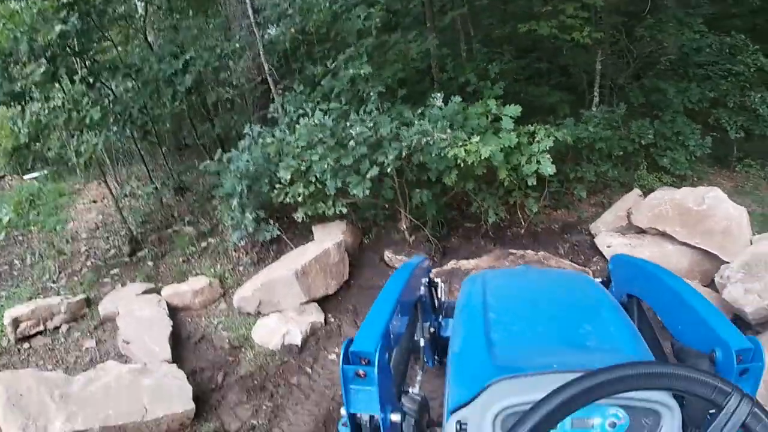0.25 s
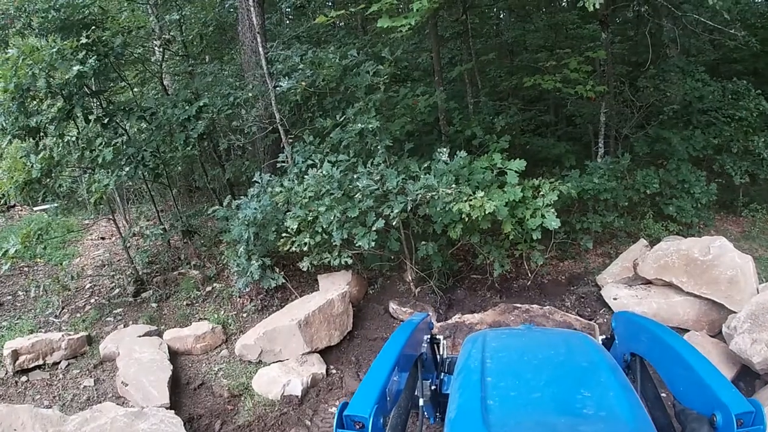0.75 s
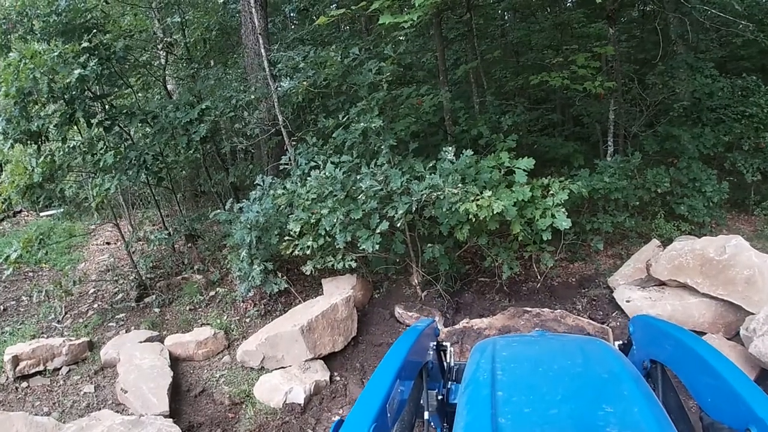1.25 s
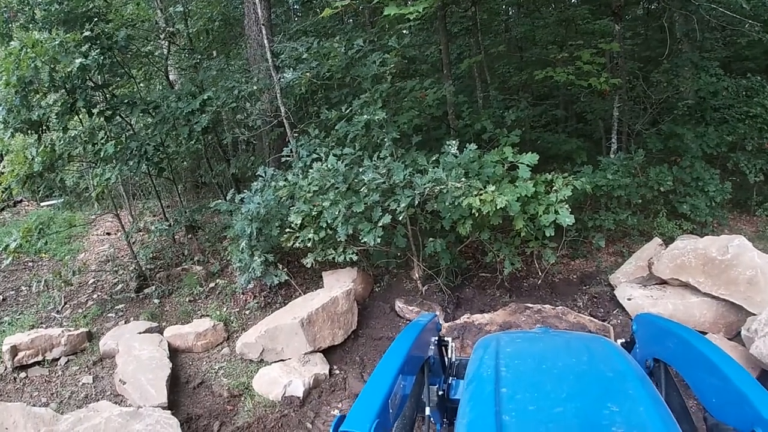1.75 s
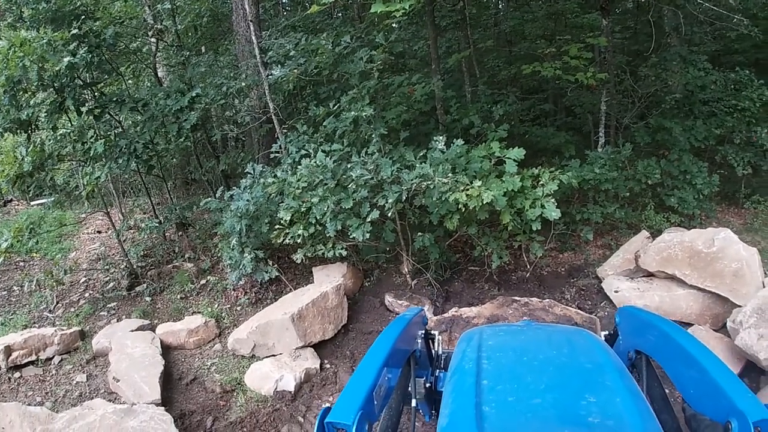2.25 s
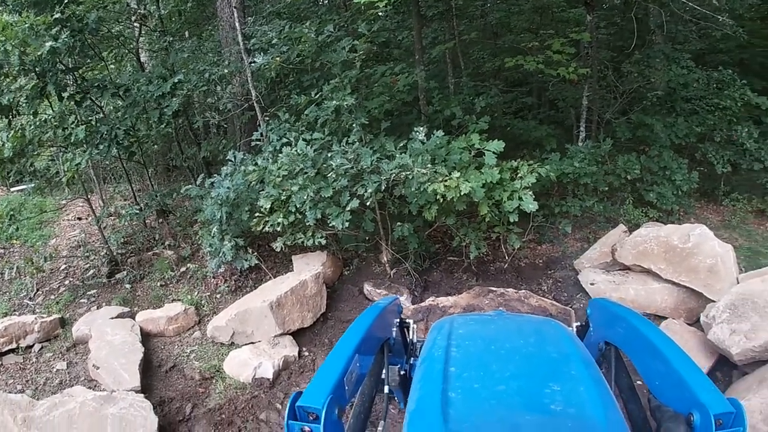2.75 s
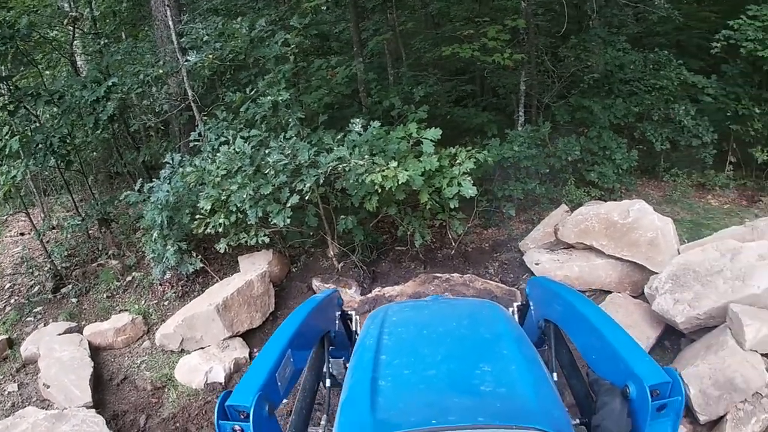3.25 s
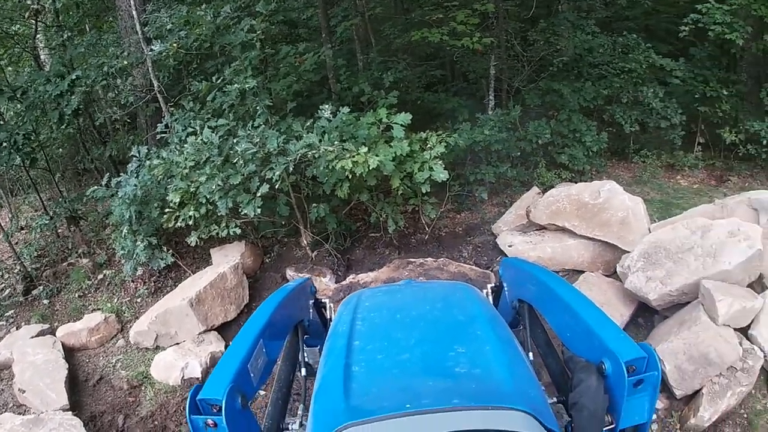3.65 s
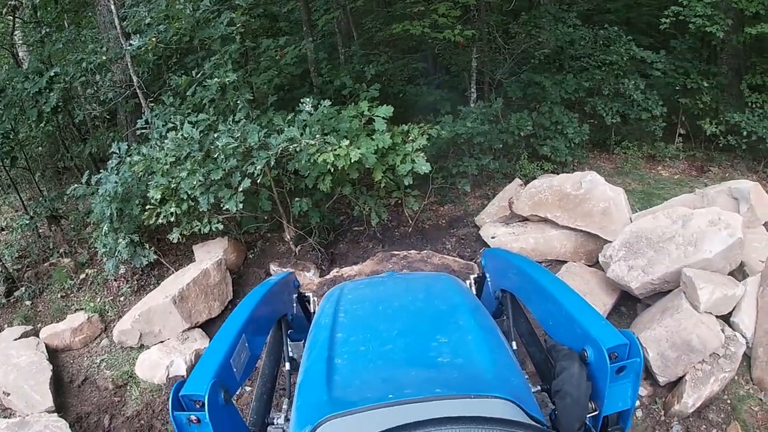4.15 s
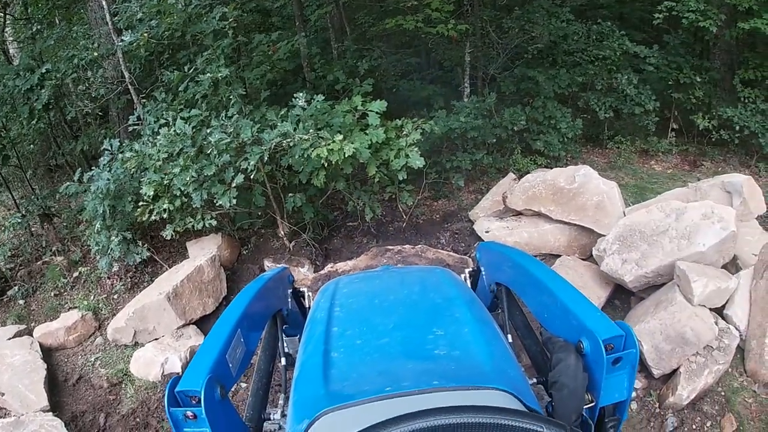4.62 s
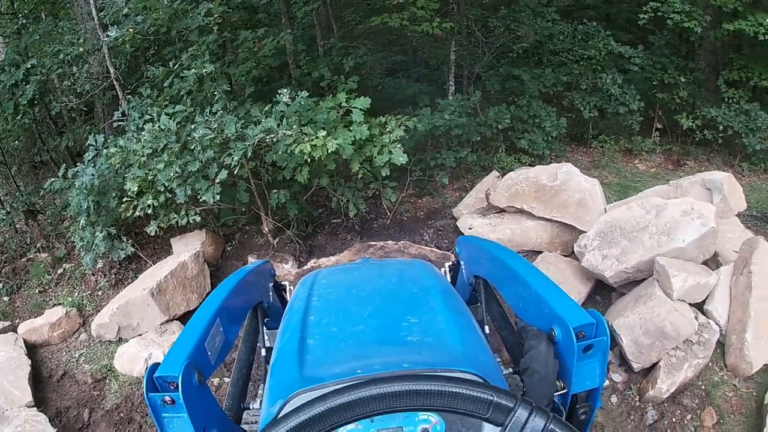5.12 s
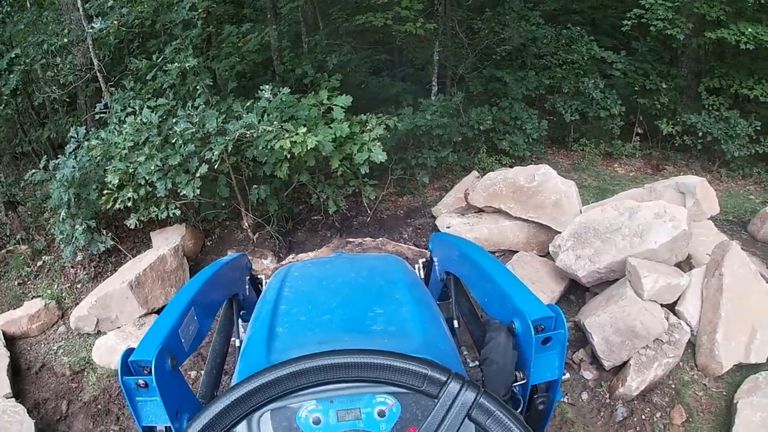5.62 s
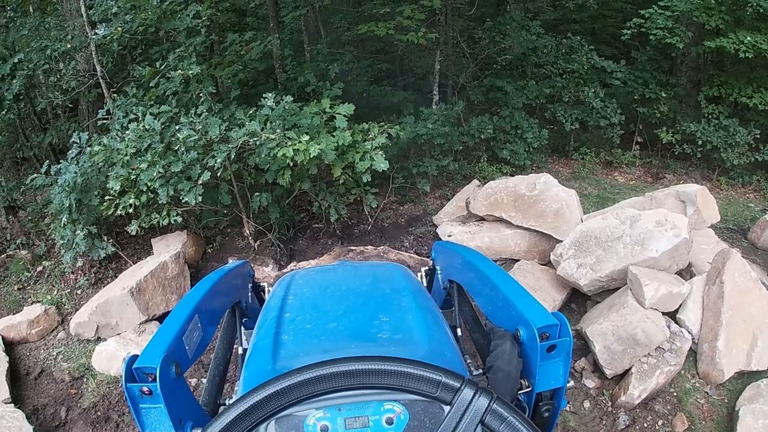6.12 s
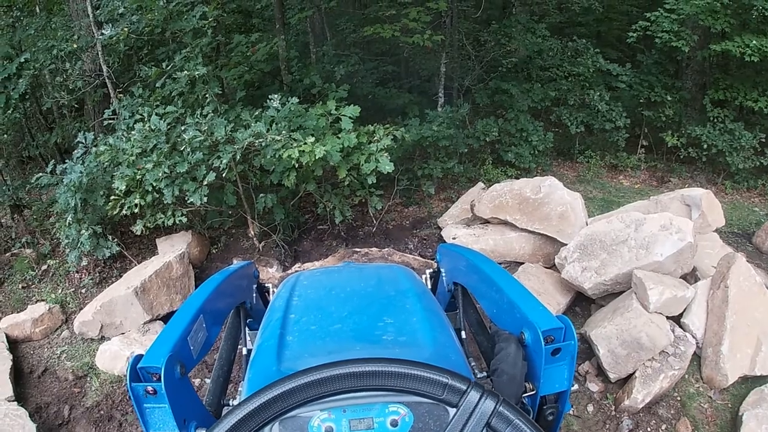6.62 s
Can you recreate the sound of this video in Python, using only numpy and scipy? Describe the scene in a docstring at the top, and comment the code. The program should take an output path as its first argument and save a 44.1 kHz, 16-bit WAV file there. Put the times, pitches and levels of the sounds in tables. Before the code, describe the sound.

After dull knocks and a squeak, a key clicks, a starter grinds briefly, and a small diesel tractor shudders into life, idles, then revs slightly.

```python
"""A three-cylinder diesel in a compact tractor is started outdoors, heard from the seat.
Dull knocks, rubs and a squeak are decaying noise, narrow-band noise and a falling tone; the key clicks round.
The starter slams in and cranks: noise and tones modulated at its tooth and armature rates.
The engine catches with a shudder that rattles the bodywork, settles to idle and is opened up a little:
its exhaust is a sum of firing orders, its block and valve gear are blows timed by the crank angle."""
import sys
import numpy as np
from scipy import signal
from scipy.fft import rfft, irfft
from scipy.io import wavfile
from scipy.ndimage import uniform_filter1d

SR = 44100
rng = np.random.default_rng(int(sys.argv[2]) if len(sys.argv) > 2 else 0)


def int16_out(signal):
    """Quantize to a 16-bit WAV file."""
    q = np.round(np.clip(np.atleast_2d(signal).T, -1, 1) * 32767)
    wavfile.write(sys.argv[1], SR, q.astype(np.int16))


N = 303408
TIME = np.arange(N) / SR  # s
CATCH_S, IDLE_FIRINGS_PER_S = 1.8, 34.4
# key switch, relays and, last, the starter solenoid: t/s, level before colouring/dB, t60/s, rise/s
SWITCHES = [(1.203, -44, 0.032, 0.0011), (1.249, -19.5, 0.04, 0.0029), (1.286, -25, 0.074, 0.00083),
            (1.3645, -24.5, 0.035, 0.0025), (1.368, -21, 0.085, 0.0042)]
# relative strength of the blows of each cylinder: level/dB
CYLINDER_DB = [-5.5, -4, -5.5]


def from_db(db):
    """Logarithmic level: decibels to amplitude gain."""
    return 10 ** (np.asarray(db) / 20)


def rms_one(x):
    """Normalisation: scale to unit mean power."""
    return x / np.sqrt(np.mean(x ** 2) + 1e-20)


def in_time(rows):
    """Linear interpolation: each column of a curve at every sample."""
    s, *columns = np.transpose(rows)
    return [np.interp(TIME, s, column) for column in columns]


def drift(rate):
    """Low-passed chance: random points, rate per second, joined by lines, with overall spread 1."""
    points = rng.standard_normal(N // 20)
    # joining by lines leaves two thirds of the variance
    return np.interp(TIME * rate, np.arange(len(points)), points) * np.sqrt(1.5)


def colour(x, spectrum, size=16384):
    """Minimum-phase filtering: a causal response of unit power gain from a magnitude spectrum."""
    hz, db = np.transpose(spectrum)
    f = np.maximum(np.arange(size // 2 + 1) * SR / size, 1)
    # octaves beyond either end of the table, falling 20 dB each
    skirts = np.maximum(np.log2(hz[0] / f), 0) + np.maximum(np.log2(f / hz[-1]), 0)
    level_db = np.interp(np.log(f), np.log(hz), db) - 20 * skirts
    cepstrum = irfft(np.log(from_db(level_db)))
    response = irfft(np.exp(rfft(2 * cepstrum[:size // 2], size)))[:size // 2]
    return signal.oaconvolve(x, response / np.linalg.norm(response))[:N]


def clicks(times, sizes):
    """Impulse excitation: a train of single-sample blows."""
    places = np.clip(np.round(times * SR).astype(int), 0, N)
    return np.bincount(places, sizes * np.ones(len(times)), N + 1)[:N]


def ring(x, hz, t60):
    """Damped resonator: a unit click sets one mode ringing as a sine of initial height 1."""
    radius, w = from_db(-60 / (t60 * SR)), 2 * np.pi * hz / SR
    return signal.lfilter([0, np.sin(w)], [1, -2 * radius * np.cos(w), radius * radius], x + 1e-18)


def dying(t, t60):
    """Exponential decay by 60 dB in t60 seconds."""
    return np.exp(-np.log(1000) * t / t60)


def swell(start, attack, hold, t60):
    """An envelope of height 1: straight attack, hold, exponential release."""
    age = np.maximum(TIME - start - attack - hold, 0)
    return np.clip((TIME - start) / attack, 0, 1) * dying(age, t60)


def struck(rows):
    """Impact envelopes: each blow rises towards its level and decays exponentially."""
    envelope = np.zeros(N)
    age = TIME[:SR // 2]
    for s, db, t60, rise in rows:
        at = max(int(s * SR), 0)
        envelope[at:at + len(age)] += from_db(db) * dying(age, t60) * (1 - np.exp(-age / rise))
    return envelope


def bursts(rows):
    """High modal density: contacts ring so many modes that they sound as noise that rises and dies."""
    return struck(rows) * rng.standard_normal(N)


def panels(x, wet_db, t60, size=4096):
    """Modal reverberation: bonnet and loader arms ring on briefly with a dense set of modes."""
    tail = dying(TIME[:size], t60) * rng.standard_normal(size)
    wet = from_db(wet_db)
    ringing = signal.oaconvolve(x, tail / np.linalg.norm(tail))[:N]
    return (x + wet * ringing) / np.sqrt(1 + wet ** 2)


def whistle(hz, db, width_hz):
    """Frequency modulation: a tone roughened by quick random flutter of its pitch."""
    phase = 2 * np.pi * np.cumsum(hz + width_hz * drift(200)) / SR
    return from_db(db) * np.sqrt(2) * np.sin(phase)


def airy(hz, db, width_hz):
    """Quadrature modulation: a narrow band of noise round a moving pitch."""
    angle = 2 * np.pi * np.cumsum(hz) / SR
    return from_db(db) * (drift(width_hz) * np.cos(angle) + drift(width_hz) * np.sin(angle))


def woodland_air():
    """Ambient noise: coloured broadband noise whose level wavers."""
    # quiet outdoor air: f/Hz, level/dB per Hz
    spectrum = [(30, -3.5), (90, -23), (155, -3.5), (350, -17.5), (1800, -22.5), (7600, -28), (9200, -32.5),
                (11000, -52)]
    return from_db(-55 + drift(29)) * colour(rng.standard_normal(N), spectrum)


def knock(s, db, t60, rise, low_hz):
    """Impact noise: one dull knock, high-passed at its own low edge."""
    high_pass = signal.butter(2, low_hz, "high", fs=SR, output="sos")
    return signal.sosfilt(high_pass, bursts([(s, db, t60, rise)]))


def contacts():
    """Impact spectra: dull knocks boom in the platform; clicks and loose sheet metal sound bright."""
    # knocks on the platform: t/s, level before filtering/dB, t60/s, rise/s, low edge f/Hz
    knock_rows = [(.001, -24, 0.3, 0.0078, 22), (.15, -38, 0.25, 0.0072, 60),
                  (0.259, -37.5, 0.11, 0.0038, 80), (0.614, -37.5, 0.39, 0.0074, 200),
                  (0.644, -27.5, 0.071, 0.0016, 287), (.685, -36.5, 0.22, 0.0018, 256)]
    # colour of the dull knocks: f/Hz, level/dB per Hz
    thud_colour = [(30, -8), (125, 7), (220, 7.5), (480, -2.5), (1300, -15.5), (2500, -16.5), (8400, -28.5),
                   (12000, -61)]
    # colour of the metal contacts: f/Hz, level/dB per Hz
    metal_colour = [(100, -25), (300, 8), (900, 2.5), (1700, 3.5), (4500, 6.5), (6500, 1.5), (8800, -1.5),
                    (10500, -19)]
    # loose bodywork, mostly as the engine catches: t/s, level before colouring/dB
    rattle_rows = [(0.05, -40), (1.837, -23.5), (1.862, -25), (1.886, -22), (1.956, -20), (2.015, -22.5),
                   (2.071, -25), (2.158, -25), (2.201, -25)]
    knocks = colour(sum(knock(*row) for row in knock_rows), thud_colour)
    rattles = bursts([(s, db, .075, .002) for s, db in rattle_rows])
    # colour of the sheet metal: f/Hz, level/dB per Hz
    rattles = colour(rattles, [(300, -1), (1500, -4), (4000, -10.0), (6000, -3.5), (8500, 0.0),
                               (10500, -16.5), (15000, -33)])
    bright = panels(colour(bursts(SWITCHES), metal_colour) + rattles, wet_db=-9.5, t60=0.28)
    return bright + knocks


def rubs():
    """Friction noise: soft rubbing of seat and controls swells and fades round one resonance."""
    # faint rubs and creaks: t/s, length/s, f/Hz, width/Hz, level/dB
    rows = [(0.093, 0.29, 1280, 241, -58), (.42, 0.13, 1270, 200, -60), (0.832, 0.28, 2190, 397, -63.5)]
    out = 0
    for s, length, hz, width_hz, db in rows:
        swelling = np.sin(np.pi * np.clip((TIME - s) / length, 0, 1))
        out = out + swelling * airy(np.full(N, hz), db, width_hz)
    return out


def squeak():
    """Stick-slip of the seat cover: a falling tone and its octave."""
    # the squeak's glide: t/s, f/Hz, level of each tone/dB
    glide = [(.55, 360, -88), (.57, 354, -55), (.59, 292, -44), (.62, 210, -67)]
    hz, db = in_time(glide)
    tone = whistle(hz, db, width_hz=29) + whistle(2 * hz, db, width_hz=75)
    return tone * (TIME > glide[0][0]) * (TIME < glide[-1][0])


def groan():
    """Harmonic buzz: the loaded drive groans as it is forced over the first compression."""
    # fundamental: t/s, f/Hz, reference level/dB
    glide = [(1.495, 271, -41), (1.515, 252, -32), (1.545, 230, -45)]
    # each multiple of the fundamental: level above the reference/dB
    harmonics_db = [0.5, -20, -3, -16, -10]
    hz, db = in_time(glide)
    tone = 0
    for multiple, level_db in enumerate(harmonics_db, 1):
        tone = tone + whistle(multiple * hz, db + level_db, width_hz=8 * multiple)
    return tone * (TIME > glide[0][0]) * (TIME < glide[-1][0])


def starter(tooth_db=5, wobble_db=4):
    """Gear meshing: the pinion slams in, grinds on the ring gear and makes the flywheel sing."""
    # slowing against each compression, racing once the engine fires: t/s, tooth rate f/Hz
    mesh = [(1.366, 600.3), (1.41, 1145), (1.45, 1278), (1.5, 837.5), (1.54, 752), (1.6, 1196),
            (1.665, 1300), (1.70, 1083), (1.75, 802), (1.8, 1044), (1.85, 1192)]
    # whine at each multiple of the tooth rate: relative level/dB
    whine_db = [-6, -8.5, -10.5]
    # load, rising into each compression and easing past it: t/s, level/dB
    load = [(1.37, -31.5), (1.42, -34), (1.49, -32.5), (1.568, -41), (1.615, -32), (1.69, -31), (1.79, -39),
            (1.87, -35), (2.0, -33.5)]
    # the flywheel's singing as the pinion drives it: t/s, level before the envelope/dB
    singing = [(1.366, -20), (1.385, -29), (1.42, -48), (1.54, -43), (1.575, -52), (1.66, -37),
               (1.705, -32), (1.735, -42), (1.76, -29.5), (1.825, -46), (1.855, -33), (1.9, -44)]
    # colour of the cranking: f/Hz, level/dB per Hz
    cranking = [(60, -4.5), (240, -4), (400, -15), (880, -3), (2050, -11), (3250, -10), (7700, -18),
                (9500, -27), (11000, -46)]
    # modes of the starter housing: f/Hz, level re the slam/dB, t60/s
    housing_modes = [(1600, -15, .08), (4950, -6.5, 0.091), (7640, -4, 0.063)]
    # compression strokes rock the engine on its mounts: t/s, level/dB
    heaves = [(1.657, -25), (1.787, -18)]
    start_s, attack_s = 1.366, 0.021
    engaged = swell(start_s, attack_s, hold=0.69, t60=0.7)
    (mesh_hz,), (load_db,), (singing_db,) = in_time(mesh), in_time(load), in_time(singing)

    # each tooth scrapes; the armature's once-a-turn wobble makes the grinding throb
    armature_hz = mesh_hz / 10
    wobble = np.sin(2 * np.pi * np.cumsum(armature_hz) / SR)
    teeth = np.sin(2 * np.pi * np.cumsum(mesh_hz) / SR)
    roughness_db = 2.4 * drift(300) + wobble_db * wobble + tooth_db * teeth
    scraping = rms_one(rng.standard_normal(N) * from_db(roughness_db))
    grind = colour(panels(scraping, wet_db=2.5, t60=0.074), cranking)
    # low orders of the armature
    growl = sum(whistle(order * armature_hz, -18.0, width_hz=10.1) for order in range(1, 5))

    whine = sum(whistle(k * mesh_hz, db, width_hz=34) for k, db in enumerate(whine_db, 1))
    # the whine follows the load by .55 dB per dB about -30 dB
    whine = whine * (1 + 0.27 * wobble) * from_db(-37.5 + .55 * (load_db + 30))
    flywheel = whistle(np.full(N, 1550), singing_db + 1.0 * drift(90), width_hz=10.05)

    slam = clicks(np.array([SWITCHES[-1][0] + 0.0025]), from_db(-23.0))
    housing = sum(from_db(db) * ring(slam, hz, t60) for hz, db, t60 in housing_modes)
    when, heave_db = np.transpose(heaves)
    heave = ring(clicks(when, -from_db(heave_db)), hz=40.7, t60=0.25)
    # the motor pulls hardest from standstill
    inrush = from_db(-36) * swell(start_s, attack_s, hold=0.011, t60=0.057)
    driven = (engaged * from_db(load_db) + inrush) * (grind + growl) + engaged * (whine + flywheel)
    return driven + groan() + housing + heave


def first_firings(push_db=18, scatter_db=-6):
    """Impulsive pressure: compressions and hard firings thump the block and make the loader arms clank."""
    # compressions and hard first firings: t/s, level before push or scatter/dB
    thump_rows = [(1.437, -26), (1.779, -25.5), (1.862, -24), (1.886, -14.5), (1.902, -16), (1.921, -17.5),
                  (1.938, -21), (1.983, -15.5), (1.996, -15.5), (2.022, -16), (2.068, -18), (2.108, -18),
                  (2.192, -19), (2.211, -14), (2.232, -17), (2.262, -19), (2.302, -25)]
    # loader arms clanking in their pins: t/s, level before colouring/dB
    clank_rows = [(1.946, -17), (2.008, -20), (2.202, -20.5), (2.271, -26)]
    # colour of the thumps: f/Hz, level/dB per Hz
    thump_colour = [(120, -9.5), (250, 9.5), (400, -4), (650, 1), (950, -13.5), (1500, -17), (4000, -44)]
    # colour of the clanks: f/Hz, level/dB per Hz
    clank_colour = [(600, -12), (1100, -1), (1550, -3), (8000, -24)]
    when, db = np.transpose(thump_rows)
    pushes = clicks(when, from_db(db + push_db))
    scatter = bursts([(s, db, .055, .0012) for s, db in thump_rows])
    thumps = colour(pushes + from_db(scatter_db) * scatter, thump_colour)
    clanks = colour(bursts([(s, db, .04, .0025) for s, db in clank_rows]), clank_colour)
    return panels(thumps + clanks, wet_db=0.0, t60=0.1)


def engine_speed():
    """Crank kinematics: firings per second, and their place between idle (0) and the fast speed (1)."""
    # idle, then the throttle is opened a little: t/s, firing rate f/Hz
    governed_speed = [(2.3, 29.76), (2.45, 33.62), (2.6, 34.85), (2.95, 33.96), (3.3, 34.44), (3.75, 34.42),
                      (4.28, 34.29), (4.42, 36), (4.62, 41.14), (4.72, 42.83), (5.1, 41.36), (5.6, 41.87),
                      (6.88, 41.84)]
    catch_firings_per_s, fast_firings_per_s = 11, 42
    governed, = in_time(governed_speed)
    run_up = np.clip((TIME - CATCH_S) / (governed_speed[0][0] - CATCH_S), 0, 1) ** .7
    speed = catch_firings_per_s + (governed - catch_firings_per_s) * run_up
    return speed, (speed - IDLE_FIRINGS_PER_S) / (fast_firings_per_s - IDLE_FIRINGS_PER_S)


def passing(turn, angle):
    """Phase timing: when the crank passes an angle (in firing intervals) after each firing."""
    running = turn > 0
    firings = np.arange(int(turn[-1]) + 1)
    return np.interp(firings + angle, turn[running], TIME[running], right=np.max(TIME) + 1)


def impacts(turn, angle, t60, fresh, uneven_db, jitter_s, size=4096):
    """Repeated impact: each cylinder rings the iron in its own way, part of the ring new each time."""
    times, out = passing(turn, angle), np.zeros(N)
    chance = rng.standard_normal((size, 2))[:len(times)]
    times = times + jitter_s * chance[:, 0]
    sizes = from_db(uneven_db * chance[:, 1])
    decay, count = dying(TIME[:size], t60), len(CYLINDER_DB)
    fresh = np.clip(fresh, 0, 1)
    for k, db in enumerate(CYLINDER_DB):
        blows = clicks(times[k::count], sizes[k::count] * from_db(db))
        same_ring = signal.oaconvolve(blows, decay * rng.standard_normal(size))[:N]
        new_ring = signal.oaconvolve(blows, decay)[:N] * rng.standard_normal(N)
        out += np.sqrt(1 - fresh) * same_ring + np.sqrt(fresh) * new_ring
    return rms_one(out)


def exhaust(turn, speed, load_db=5, imbalance=0.06, unsteady_db=0.5, count=10):
    """Fourier series: a puff per firing, as its orders, weighted and delayed by the silencer."""
    # exhaust through the silencer: f/Hz, relative level/dB
    silencer = [(26, -14), (35, 2), (42, 1), (69, -2), (84, -3.5), (103, -5.5), (126, -4.5), (140, -5),
                (168, -4), (208, -13.5), (245, -19), (320, -36)]
    # resonances of the silencer box and pipe that hold back each puff: f/Hz, width/Hz
    chambers = [(75, 5), (108, 8), (125, 154)]
    hz, db = np.transpose(silencer)
    # the engine works hardest while it gathers speed, and then booms on its low orders
    load = np.clip(uniform_filter1d(np.gradient(speed) * SR, SR // 5) / 20, 0, 1)
    out = 0
    for order in range(1, count + 1):
        f = order * speed
        boom_db = load_db * load * np.interp(order, [1, 2, 6], [0, 1, .3])
        level_db = np.interp(f, hz, db) + boom_db + unsteady_db * drift(25)
        lag = sum(2 * np.arctan2(f * width, centre ** 2 - f ** 2) for centre, width in chambers)
        out = out + from_db(level_db) * np.cos(2 * np.pi * order * turn - lag)
    # the cylinders are not equally strong
    out = out * (1.5 + imbalance * np.cos(2 * np.pi * turn / len(CYLINDER_DB)))
    # power grows with the firing rate
    return rms_one(out * np.sqrt(speed) * from_db(-0.45 * load_db * load))


def block(turn):
    """Structure-borne sound: combustion knock and piston slap ring in the block and panels."""
    # colour of the engine block: f/Hz, level/dB per Hz
    spectrum = [(25, -17.5), (120, 3.5), (210, 5), (320, -2.5), (380, -3.5), (470, 3.5), (590, -5),
                (720, -2.5), (900, -21.5), (1900, -20), (5000, -46)]
    combustion = impacts(turn, .8, t60=0.1, fresh=0.25, uneven_db=-1.5, jitter_s=.00012)
    slap = impacts(turn, .38, t60=0.13, fresh=0.49, uneven_db=1.0, jitter_s=0.00019)
    return rms_one(colour(combustion + from_db(0.5) * slap, spectrum))


def clatter(turn):
    """Impact and flow noise: injectors and valves tick over the rush of the cooling fan."""
    # colour of the clatter: f/Hz, level/dB per Hz
    spectrum = [(300, -6), (900, 5), (1300, -1), (2650, -3.5), (3300, -2), (4200, -5), (5300, -4.5),
                (7400, -13.5), (8700, -18), (11000, -41), (15000, -47.5)]
    injectors = impacts(turn, .76, t60=0.25, fresh=0.51, uneven_db=2.5, jitter_s=.0001)
    inlet = impacts(turn, .47, t60=0.1, fresh=0.39, uneven_db=1.0, jitter_s=.0002)
    outlet = impacts(turn, .09, t60=0.034, fresh=0.96, uneven_db=-3.5, jitter_s=0.00022)
    fan = rng.standard_normal(N) * from_db(2.0 * drift(300))
    ticks = injectors + from_db(-4.0) * inlet + from_db(-5.0) * outlet
    return rms_one(colour(panels(ticks + from_db(5.5) * fan, wet_db=-2.0, t60=0.14), spectrum))


def loose_parts(turn):
    """Impact across clearances: uneven gear backlash at every firing, one loose tappet once a cycle."""
    # colour of the gear backlash: f/Hz, level/dB per Hz
    lash_colour = [(700, -11), (1200, -2), (2150, 0), (5000, -17)]
    # colour of the tappet: f/Hz, level/dB per Hz
    tappet_colour = [(2000, -3), (6000, 3.5), (8200, -5), (9500, -12), (11000, -31)]
    lash = sum(impacts(turn, angle, t60=0.048, fresh=0.69, uneven_db=2.0, jitter_s=.002)
               for angle in (.25, .6))
    cycles = clicks(passing(turn, .7)[1::len(CYLINDER_DB)], 1)
    tick = signal.oaconvolve(cycles, dying(TIME[:SR // 8], 0.041))[:N] * rng.standard_normal(N)
    lash = from_db(-50) * rms_one(colour(lash, lash_colour))
    return lash + from_db(-62.5) * rms_one(colour(tick, tappet_colour))


def engine():
    """Crank-synchronous sources: every part follows the crankshaft, its level set by speed and fuel."""
    # extra fuel for the start: start t/s, attack/s, hold/s, release t60/s
    start_fuel = (1.902, 0.089, 0.23, 0.56)
    # extra fuel for the step up in speed: start t/s, attack/s, hold/s, release t60/s
    throttle_fuel = (4.3, 0.26, 0.062, 0.9)
    # each part: level at idle/dB, then added at the fast speed, by starting and by throttle fuel/dB
    exhaust_level = (-24.5, 0.22, -0.4, 1.5)
    block_level = (-35.5, 0.5, 7, 2)
    clatter_level = (-43, 0.2, 10, 3.5)
    speed, fast = engine_speed()
    # crank angle counted in firings
    turn = np.cumsum(speed * (TIME > CATCH_S)) / SR
    effort = np.array([np.ones(N), np.maximum(fast, 0), swell(*start_fuel), swell(*throttle_fuel)])
    parts = [(exhaust_level, exhaust(turn, speed)), (block_level, block(turn)),
             (clatter_level, clatter(turn))]
    sound = sum(from_db(np.dot(level, effort)) * part for level, part in parts)
    return (sound + loose_parts(turn)) * np.clip((TIME - CATCH_S) / 0.034, 0, 1)


def whistles(throb=0.3, width_hz=80, core_db=-3.0, haze_db=-5):
    """Amplitude modulation: faint wavering whistles of the running engine throb with the firings."""
    # thin whistle: t/s, f/Hz, level before core or haze and the final trim/dB
    thin_whistle = [(2.5, 3350, -51.5), (2.95, 3210, -48.5), (3.45, 3256, -50.5), (4.24, 3210, -46),
                    (4.75, 3496, -57), (5.08, 3320, -49), (5.6, 3370, -51)]
    # at the fast speed: f/Hz, level before trim/dB, flutter/Hz, surge gain/dB, share of pitch it adds
    high_whistles = [(4740, -56, 40.3, 8, .032), (5030, -54, 15.7, -5, .008)]
    # surge after the throttle is opened: start t/s, attack/s, hold/s, release t60/s
    surge_shape = (4.5, .17, 0.17, 2)
    speed, fast = engine_speed()
    surge, (hz, db) = swell(*surge_shape), in_time(thin_whistle)
    tones = whistle(hz, db + core_db, width_hz=17) + airy(hz, db + haze_db, width_hz)
    tones = tones * np.minimum(speed / IDLE_FIRINGS_PER_S, 1) ** 8
    for hz, db, flutter_hz, surge_db, rise in high_whistles:
        tone = whistle(hz * (1 + rise * surge), db + surge_db * surge, flutter_hz)
        tones = tones + np.clip(fast, 0, 1) * tone
    return tones * (1 + throb * np.sin(2 * np.pi * np.cumsum(speed) / SR)) * from_db(-1.15)


def shudder():
    """Modal resonance: hard first firings shake the frame, whose loose parts hammer its low modes."""
    # modes of the frame and bonnet: f/Hz, relative level/dB, t60/s
    frame_modes = [(114.8, 3, 0.027), (155, -2, 0.17), (221.3, 0.5, 0.088), (254, -8, 0.12),
                   (326.4, -1, 0.058)]
    # the shaking: start t/s, attack/s, hold/s, release t60/s
    shape = (1.828, 0.044, 0.21, 1.44)
    shaking = rng.standard_normal(N) * from_db(2.7 * drift(120))
    modes = 0
    for k, (hz, db, t60) in enumerate(frame_modes):
        # neighbouring modes move in opposite phase
        modes = modes + (-1) ** k * from_db(db) * rms_one(ring(shaking, hz, t60))
    return from_db(-22.5) * swell(*shape) * rms_one(modes)


def scene():
    """Superposition: the tractor over quiet woodland air."""
    before_start = woodland_air() + contacts() + rubs() + squeak()
    starting = starter() + first_firings()
    running = engine() + whistles() + shudder()
    return (before_start + starting + running)[None]


def record(dry):
    """Low-pass filtering: the top is cut steeply, by 60 dB from 16200 Hz up."""
    return signal.sosfilt(signal.cheby2(16, 60, 16200, fs=SR, output="sos"), dry)


dry = scene()
out = record(dry)
int16_out(out)
```